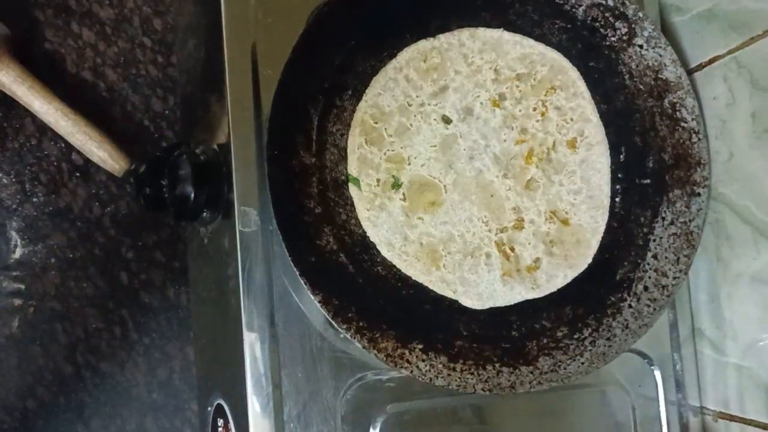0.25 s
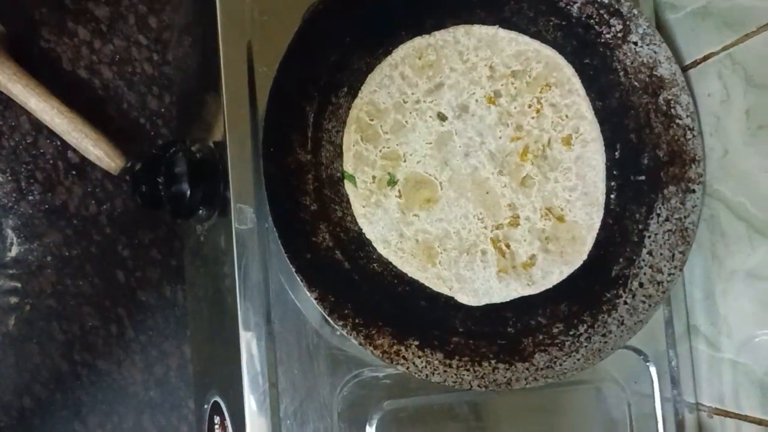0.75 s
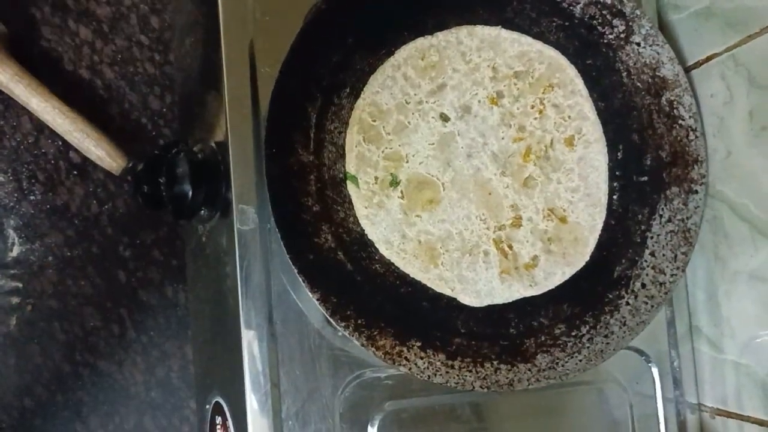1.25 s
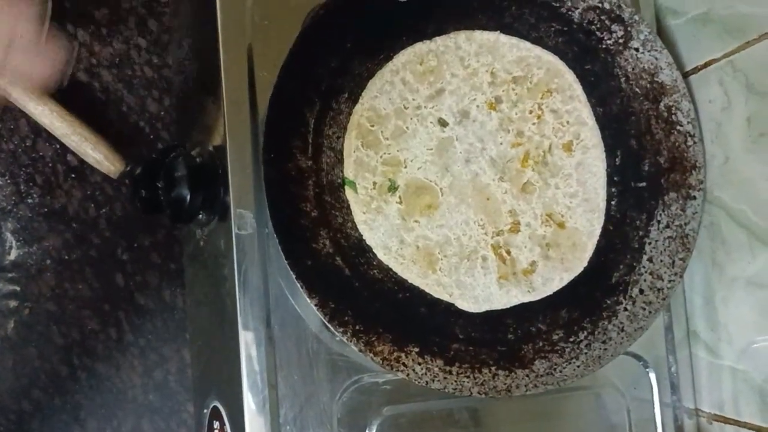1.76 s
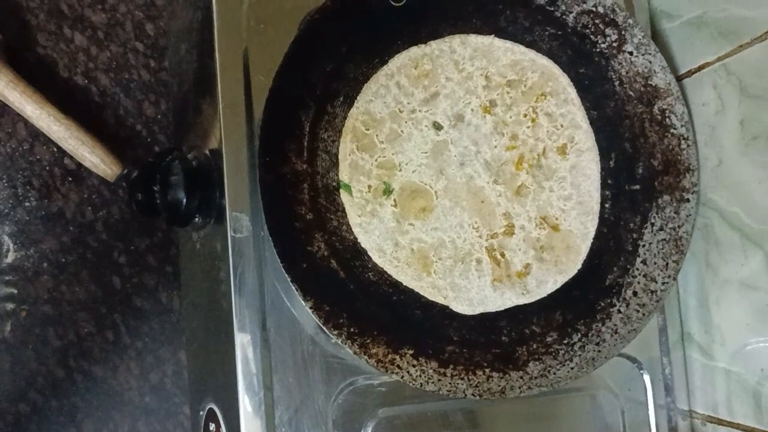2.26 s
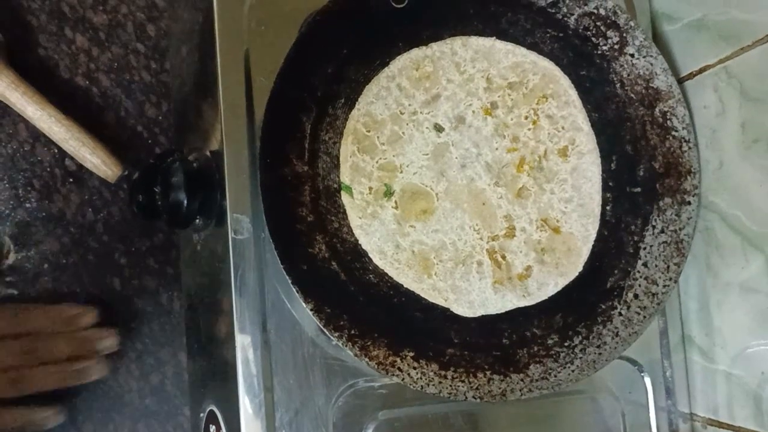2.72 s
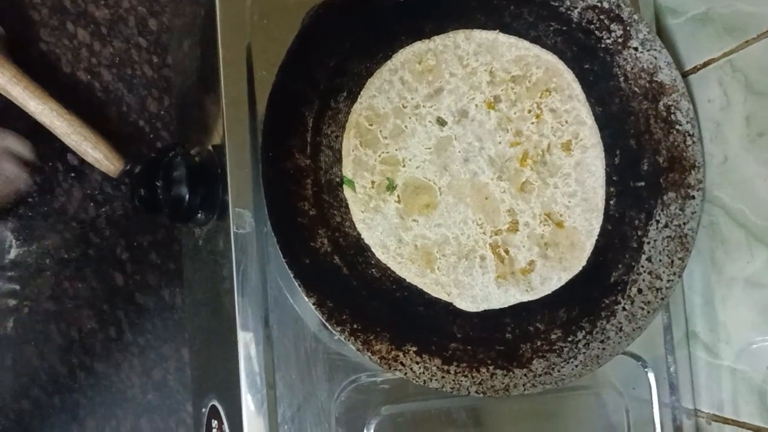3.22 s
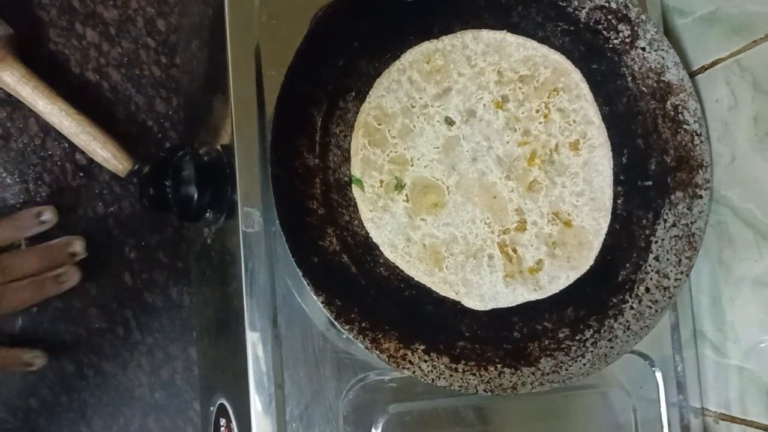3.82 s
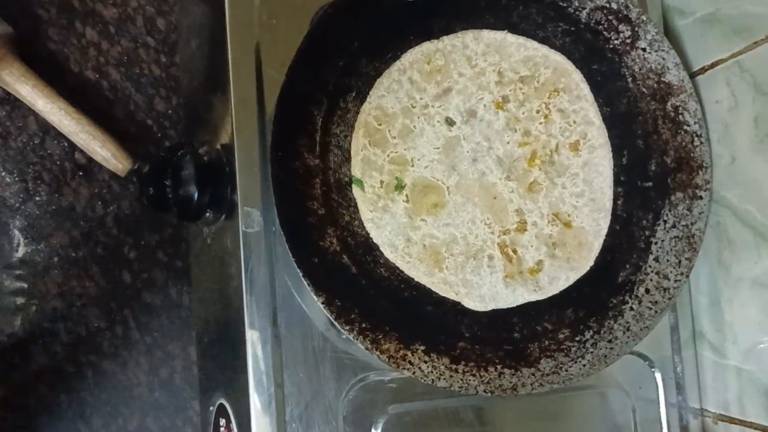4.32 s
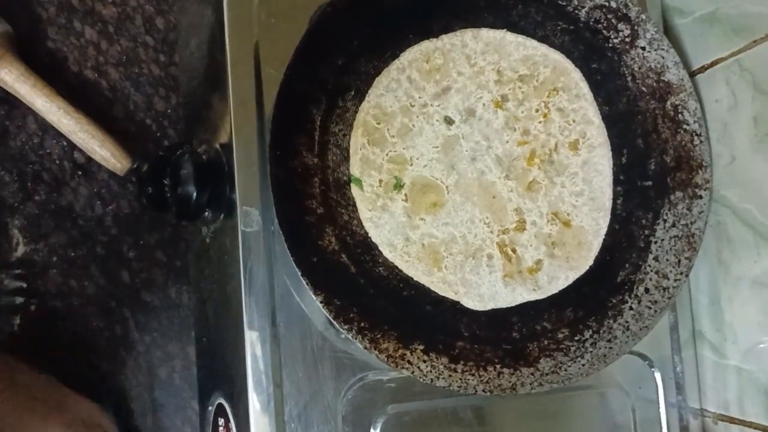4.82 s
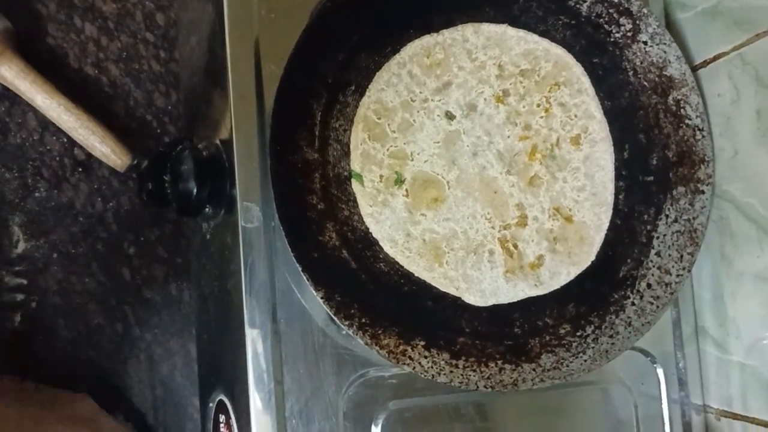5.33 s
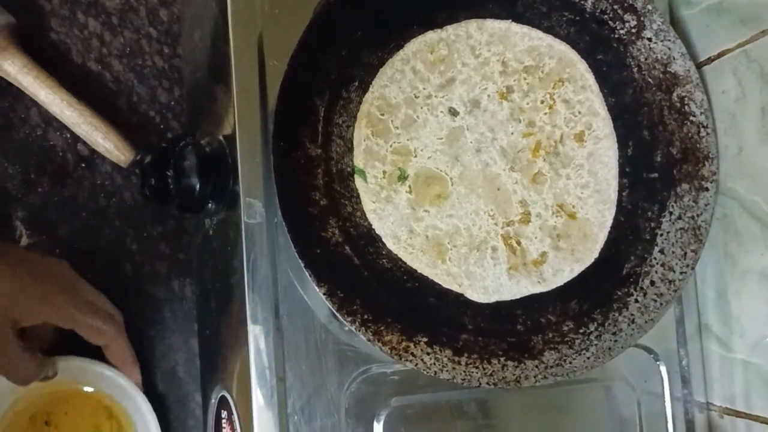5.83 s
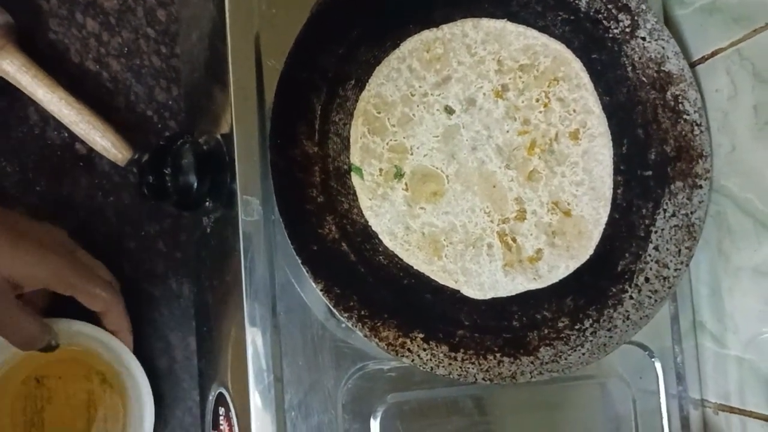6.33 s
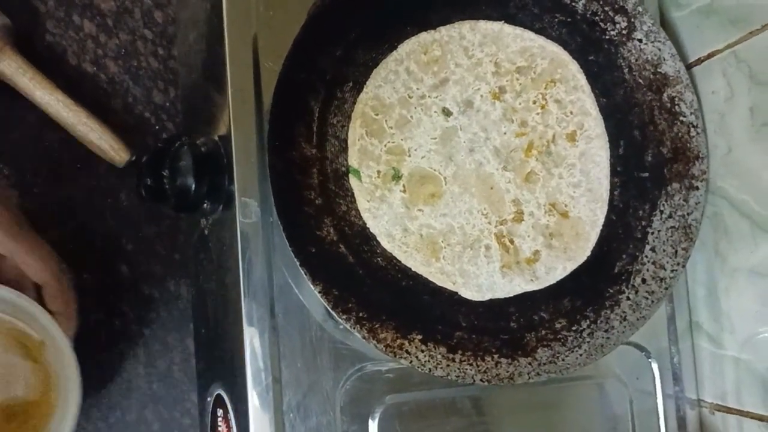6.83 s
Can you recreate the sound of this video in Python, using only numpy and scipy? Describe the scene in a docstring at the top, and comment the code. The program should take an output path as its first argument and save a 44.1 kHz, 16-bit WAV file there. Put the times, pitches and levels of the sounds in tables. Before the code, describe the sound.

Close kitchen sounds with short reflections: quiet steady stove noise and a trace of sizzle under soft handling rustle. Delicate spoon clinks grow louder and quicker, ending in one hard ringing knock on the worktop. After a pause, a bowl's foot judders and squeaks over stone, is shoved again with a rattling metallic clatter, and settles, leaving faint last touches.

```python
"""In a small hard kitchen, a steel spoon and a metal bowl are handled on a stone counter by a lit stove.
Spoon clinks, counter knocks and bowl taps are noisy cracks plus ringing tones that die away.
The bowl is dragged with a juddering groan, then scrapes and clatters to rest: many tiny random slips
drive its resonances. Steady filtered noise makes the burner. Echoes of the kitchen follow the contacts.
"""
import sys
import numpy as np
from scipy import signal
from scipy.io import wavfile
from scipy.ndimage import uniform_filter1d

SR = 44100
rng = np.random.default_rng(int(sys.argv[2]) if len(sys.argv) > 2 else 0)


def log_audio(samples):
    """Write samples as a 16-bit WAV file to the path given in sys.argv[1]."""
    # one column per channel
    frames = np.atleast_2d(samples).T
    # limit to full scale, then quantise
    limited = np.clip(frames, -1, 1)
    pcm = np.round(limited * 32767).astype(np.int16)
    wavfile.write(sys.argv[1], SR, pcm)


N = 311787
TIME = np.arange(N) / SR
HALF_SECOND = np.arange(SR // 2) / SR
SPLIT_HZ = 4200  # the treble of a contact lies above this, its middle below


def amp(db):
    """Turns decibels into a gain."""
    return 10 ** (np.asarray(db) / 20)


def evened(x):
    """Scales a sound to an average (rms) level of 1."""
    return x / np.sqrt(np.mean(x ** 2) + 1e-20)


def peaked(x, size=128):
    """Scales a sound so that its loudest stretch of `size` samples has rms 1."""
    return x / np.sqrt(uniform_filter1d(x ** 2, size).max())


def read(points, hz):
    """Reads a table by frequency, joined by straight lines over log frequency."""
    f, value = np.transpose(points)
    return np.interp(np.log(hz + 1), np.log(f + 1), value)


def level(rows, lag_s=0):
    """Turns a dB curve over time into a gain, silent outside its span."""
    s, db = np.transpose(rows)
    return amp(np.interp(TIME - lag_s, s, db, left=-np.inf, right=-np.inf))


def spells(rows, fade_s, column=2):
    """Gain that fades in, holds one dB column of each row, and fades out."""
    gain = 0
    for row in rows:
        to_nearest_end = np.minimum(TIME - row[0], row[1] - TIME)
        gain = gain + amp(row[column]) * np.clip(to_nearest_end / fade_s + .5, 0, 1)
    return gain


def add(mix, s, sound):
    """Mixes a sound in at time s."""
    part = mix[max(round(s * SR), 0):][:len(sound)]
    part += sound[:len(part)]


def colour(x, points, size=2048):
    """Gives a sound the spectrum in a table, with a filter that never acts ahead of time."""
    log_gain = np.log(amp(read(points, abs(np.fft.fftfreq(size, 1 / SR)))))
    # minimum phase: the filter responds as early as its spectrum allows
    taps = np.fft.ifft(np.exp(np.conj(signal.hilbert(log_gain)))).real
    return signal.oaconvolve(x, taps[:size // 2])[:len(x)]


def band(x, hz, kind, order=4):
    """Keeps the highs, the lows or a band (Butterworth filter)."""
    return signal.sosfilt(signal.butter(order, hz, kind, fs=SR, output="sos"), x)


def resonances(x, peaks):
    """Lets a sound drive resonances side by side, each at its own level; rms 1."""
    out = 0
    for hz, width, db in peaks:
        # two passes make the peak steep; together they narrow it, so each is made wider
        b, a = signal.iirpeak(hz, hz / (1.5 * width), SR)
        once = signal.lfilter(b, a, x)
        out = out + amp(db) * evened(signal.lfilter(b, a, once))
    return evened(out)


def ringing(modes, vary_db=2):
    """Half a second of ringing tones (modes), each woken a little differently; t60 = time to fall 60 dB."""
    hz, db, t60 = np.transpose(modes)
    strength = amp(db + vary_db * rng.uniform(-1.4, 1, len(hz)))
    woken = strength * np.exp(2j * np.pi * rng.random(len(hz)))
    swing_and_decay = 2j * np.pi * hz[:, None] - np.log(1000) / t60[:, None]
    return (woken @ np.exp(swing_and_decay * HALF_SECOND)).real


def after_ring(rows, modes, rise_s):
    """Modes that swell a moment after the contact, then die away."""
    out = np.zeros(N)
    for s, db in rows:
        ring = ringing(modes, vary_db=-0.5) * (1 - np.exp(-HALF_SECOND / rise_s))
        add(out, s, amp(db) * peaked(ring, size=512))
    return out


# a firmer blow rings louder and booms more: dB gained for each dB above a firm blow
FIRM_DB, RING_GROWTH, THUMP_GROWTH = -26, 0.39, 0.54


def strikes(rows, modes, crack_colour, crack_t60, ring_db):
    """Each blow is a short crack plus ringing modes; each row sets how strong it is below the treble."""
    out = np.zeros(N)
    # steel meets a hard surface: most of the push comes in the first millisecond
    snap = 2.5 * np.exp(-HALF_SECOND / .0008)
    force = snap + np.exp(-np.log(1000) * HALF_SECOND / crack_t60)
    onset = 1 - np.exp(-HALF_SECOND / 0.000067)
    for s, treble_db, middle_db in rows:
        noise = rng.standard_normal(len(HALF_SECOND))
        crack = peaked(colour(noise * force, crack_colour))
        ring_gain = amp(ring_db + RING_GROWTH * (treble_db - FIRM_DB))
        blow = crack + ring_gain * ringing(modes) * onset
        treble = peaked(band(blow, SPLIT_HZ, "high"))
        middle = peaked(band(blow, SPLIT_HZ, "low"))
        add(out, s, amp(treble_db) * (treble + amp(middle_db) * middle))
    return out


def thumps(rows, firm_db, rise_s, fall_s, low_hz=65, high_hz=190):
    """The counter takes up each blow as a dull boom that swells and fades."""
    out = np.zeros(N)
    swell = (1 - np.exp(-HALF_SECOND / rise_s)) * np.exp(-HALF_SECOND / fall_s)
    for s, treble_db, _ in rows:
        noise = rng.standard_normal(len(HALF_SECOND))
        boom = band(noise, [low_hz, high_hz], "band", order=2) * swell
        gain = amp(firm_db + THUMP_GROWTH * (treble_db - FIRM_DB))
        add(out, s, gain * peaked(boom, size=1024))
    return out


def friction(per_s, spread_db):
    """Tiny slips of uneven size at random moments."""
    unevenness = np.minimum(rng.exponential(1, N), 4)
    sizes = amp(spread_db * unevenness) * rng.choice([-1., 1.], N)
    return evened(sizes * (rng.random(N) < per_s / SR))


def flutter(rate_hz, depth_db):
    """Uneven contact pressure, as a gain that wanders at random."""
    return amp(depth_db * evened(band(rng.standard_normal(N), rate_hz, "low", order=2)))


def grains(per_s, spread_db, depth_db, count=16):
    """Fine friction grains: each range of pitch flickers on its own."""
    edges_hz = np.linspace(10, 127, count + 1) ** 2
    out = np.zeros(N)
    for pair in zip(edges_hz, edges_hz[1:]):
        out += band(friction(per_s, spread_db), pair, "band", order=2) * flutter(30, depth_db)
    return evened(out)


# how long the kitchen echoes at each pitch: (frequency [Hz], t60 [s])
KITCHEN_T60 = [(80, 0.24), (250, 0.15), (600, 0.55), (2000, 0.28), (5000, 0.3), (9000, 0.21), (15000, 0.2)]


def kitchen(x, wet_db, near_db, build_s=0.0068, size=32768):
    """Direct sound, a few quick reflections from counter and wall, and a tail that dies band by band."""
    taps = rng.choice([-1., 1.], size) * (rng.random(size) < .2)
    hz, t, z = signal.stft(taps, SR, nperseg=256)
    decay = amp(-60 * t / read(KITCHEN_T60, hz)[:, None])
    tail = signal.istft(z * decay, SR, nperseg=256)[1][:size]
    tail *= 1 - np.exp(-np.arange(size) / SR / build_s)
    echo = amp(wet_db) * tail / np.linalg.norm(tail)
    delays = (SR * (.001 + .012 * rng.random(8))).astype(int)
    echo[delays] += amp(near_db) * rng.choice([-1., 1.], len(delays))
    return x + signal.fftconvolve(x, echo)[:N]


# spectrum of burner and kitchen air: (frequency [Hz], level [dB])
AIR_COLOUR = [(15, -65), (25, -28.5), (75, 1), (160, -7), (215, -16.5), (598, -16.5), (722, -20),
              (970, -23.5), (1080, -22.5), (1490, -25), (1660, -27.5), (2560, -28), (5430, -46),
              (15500, -49.5)]
# where the sizzle is strongest: (frequency [Hz], width [Hz], level [dB])
SIZZLE_PEAKS = [(6430, 420, 4), (8840, 1600, 9)]
# spells of a faint far tone: (start [s], end [s], level [dB])
FAR_TONE = [(0, 1.1, -83), (1.03, 1.88, -76)]
# pitches of that tone: (frequency [Hz], width [Hz], level [dB])
FAR_TONE_LINES = [(984, 27, 8.5), (1480, 35, 3)]
BURNER_RUMBLE_DB, BURNER_HISS_DB, SIZZLE_DB = -67, -73.5, -88  # all steady


def stove(split_hz=270):
    """Filtered noise gives burner rumble and hiss and a far tone; tiny random pops give a faint sizzle."""
    air = colour(rng.standard_normal(N), AIR_COLOUR, size=8192)
    rumble = amp(BURNER_RUMBLE_DB) * evened(band(air, split_hz, "low"))
    hiss = amp(BURNER_HISS_DB) * evened(band(air, split_hz, "high"))
    sizzle = amp(SIZZLE_DB) * resonances(friction(per_s=11000, spread_db=3.5), SIZZLE_PEAKS)
    far_tone = resonances(rng.standard_normal(N), FAR_TONE_LINES)
    return rumble + hiss + sizzle + spells(FAR_TONE, fade_s=0.023) * far_tone


# light spoon clinks: (time [s], treble level [dB], middle level above treble [dB])
CLINK_HITS = [(.19, -49, -22), (.4833, -37, -18), (.6201, -51.5, -20), (.7528, -37, -24),
              (.9968, -44.5, -15), (1.0295, -45, -22), (1.181, -54.5, -15), (1.2027, -64, -4),
              (2.259, -57, -15), (2.3195, -36, -24), (2.5266, -27, -17), (2.7227, -27.5, -24.5),
              (2.9339, -22.5, -17.5), (3.0141, -31, -13.5), (3.1272, -40.5, -14.5), (3.2266, -23.5, -22),
              (3.5813, -24, -29.5), (3.5875, -23, -18), (4.2464, -32.5, -18), (5.4709, -49, -14.5),
              (5.7018, -34.5, -11.5), (6.4851, -48, -14), (6.7471, -57.5, -8.5), (6.821, -43.5, -16)]
# ringing modes of the spoon: (frequency [Hz], level [dB], t60 [s])
SPOON_MODES = [(1945, -6, .24), (2160, -12, .14), (2600, -7, .07), (5500, -26, .3), (5540, -22, .12),
               (6075, -27, .3), (8150, -16, .06), (10430, -9, .08), (10500, 1, .07), (10508, -15, .3),
               (11570, -25, .3), (12100, -18, .07), (15150, -20, .09)]
# colour of the spoon's first crack: (frequency [Hz], level [dB])
SPOON_CRACK_COLOUR = [(150, 4.5), (800, 3.5), (2700, 2), (4200, -14.5), (5200, -9.5), (5850, -8),
                      (6500, -5.5), (7200, -6.5), (8200, 1.5), (9800, -2), (10500, 1), (11200, -8),
                      (12100, 0.5), (13800, -19), (15300, 0.5)]


def spoon_clinks():
    """Light touches of the spoon: a tiny crack, then the spoon's own ringing modes."""
    return strikes(CLINK_HITS, SPOON_MODES, SPOON_CRACK_COLOUR, crack_t60=.018, ring_db=-9)


def counter_thumps():
    """The counter booms dully under every clink, knock and tap."""
    light = thumps(CLINK_HITS, firm_db=-59.5, rise_s=0.04, fall_s=0.065)
    return light + thumps(KNOCK_HITS + TAP_HITS, firm_db=-54.5, rise_s=0.029, fall_s=0.06)


# spells in which hands move things about on the counter:
# (start [s], end [s], rustle and rumble level [dB], low hum level [dB])
HANDLING_SPELLS = [(.42, .7, -71, -76), (.76, .87, -61, -55), (1.64, 1.9, -68.5, -60),
                   (2.25, 3.36, -68, -58), (3.6, 4.33, -67, -63.5), (4.8, 5.8, -65, -66.5),
                   (5.85, 6.28, -53.5, -58.5), (6.28, 6.7, -68, -81)]
# the low hum: (frequency [Hz], width [Hz], level [dB])
LOW_HUM = [(88.5, 4.6, 0)]


def handling(rumble_db=3, rustle_db=-1, split_hz=270, fade_s=0.12):
    """Moving hands bring a soft rumble and rustle, and a low hum swells with them."""
    noise = colour(rng.standard_normal(N), AIR_COLOUR, size=8192)
    rumble = amp(rumble_db) * evened(band(noise, split_hz, "low"))
    rustle = amp(rustle_db) * evened(band(noise, split_hz, "high"))
    hum = resonances(rng.standard_normal(N), LOW_HUM)
    rub = spells(HANDLING_SPELLS, fade_s, column=2) * (rumble + rustle)
    return rub + spells(HANDLING_SPELLS, fade_s, column=3) * hum


# steel brushing over the counter: (start [s], length [s], level [dB])
SCUFF_STROKES = [(1.45, 0.069, -65), (0.765, 0.14, -73), (1.662, 0.064, -63), (1.711, 0.076, -60),
                 (3.224, 0.094, -48), (3.596, 0.1, -60), (4.136, 0.15, -48), (5.707, 0.066, -51.5),
                 (6.411, 0.053, -65)]
# colour of the strokes: (frequency [Hz], level [dB])
STROKE_COLOUR = [(200, 2.5), (1800, 5.5), (3000, 4.5), (4200, -9), (6500, -3), (9200, 2), (12500, -9.5),
                 (15300, -5)]


def scuffs():
    """Short crunchy strokes of steel over stone, made of tiny slips."""
    out = np.zeros(N)
    grit = evened(colour(friction(per_s=2200, spread_db=0.0), STROKE_COLOUR))
    for s, length, db in SCUFF_STROKES:
        stroke = grit[int(s * SR):][:int(length * SR)]
        add(out, s, amp(db) * stroke * signal.windows.tukey(len(stroke), .5))
    return out


# harder knocks of steel on the counter: (time [s], treble level [dB], middle level above treble [dB])
KNOCK_HITS = [(1.670, -45.5, -6.5), (1.745, -64, 9.5), (1.9047, -47.5, -13.5), (3.684, -34, -2.5),
              (3.800, -40, -9.5), (3.812, -35, -5), (3.938, -43.5, -9), (4.1048, -19.5, -12),
              (4.1158, -27, 4), (4.1203, -21, -20.5)]
# ringing modes of the knocked steel: (frequency [Hz], level [dB], t60 [s])
STEEL_MODES = [(1170, -10, 0.184), (1402, -4, 0.22), (1945, -3.5, 0.13), (2080, -26, .15),
               (3050, -9.5, 0.071), (5400, -22, 0.2), (6130, -12.5, 0.16), (8670, -3.5, 0.024),
               (9600, -10, 0.2), (9040, -8, 0.183), (8960, 24, 0.0085), (9200, -1.5, 0.26),
               (10580, -19.5, .3), (11910, -16, 0.22)]
# colour of each knock's first crack: (frequency [Hz], level [dB])
STEEL_CRACK_COLOUR = [(100, -5.5), (450, 2.5), (950, -1.5), (1550, 5.5), (2800, 1), (4500, -17.5),
                      (5300, -4), (6200, -12.5), (8200, -7.5), (9000, 8), (10000, -5.5), (12400, 3),
                      (13600, -16), (15300, -2.5)]


def counter_knocks():
    """The steel knocks down on the counter: a crack, then the steel's ringing modes."""
    return strikes(KNOCK_HITS, STEEL_MODES, STEEL_CRACK_COLOUR, crack_t60=0.017, ring_db=-14.5)


# clinks near the middle of the spoon make its handle sing: (time [s], level [dB])
HANDLE_PINGS = [(2.527, -59), (2.934, -48), (3.014, -55), (3.227, -49), (3.275, -54), (6.822, -68)]
# bending modes of the handle: (frequency [Hz], level [dB], t60 [s])
HANDLE_MODES = [(1945, 0, .24), (2590, -2, .07), (5500, -18, .24)]


def handle_pings():
    """The spoon's handle bends to and fro and sings after some clinks."""
    return after_ring(HANDLE_PINGS, HANDLE_MODES, rise_s=0.0012)


# thin squeaks of sliding metal: (middle [s], length [s], level [dB], slip rate [per s])
THIN_SQUEAKS = [(2.791, 0.18, -66, 1170), (4.898, .006, -26.5, 1400), (5.059, 0.0081, -34, 1240),
                (5.269, 0.055, -53, 2310), (5.38, 0.095, -58, 2050)]
# the bowl's foot catches on the stone: (time [s], level [dB])
FOOT_CATCHES = [(4.861, -11.5), (4.931, -1), (4.972, -11), (5.006, -25), (5.113, -4), (5.214, -23),
                (5.284, -28)]
# each catch squeaks, hoots, then drones:
# (delay to the middle [s], length [s], level [dB], slip rate [per s], growth [dB per dB of the catch])
STAGES = [(-.024, .022, -31.5, 1165, 1), (0, .054, -20, 402, 1), (0.013, .095, -24.5, 304, 4.4)]
# overtones of the slips: (multiple of the slip rate [-], level [dB])
SLIP_PARTIALS = [(1, 7.5), (2, -14.5), (3, -13.5), (4, -35)]


def judders(jitter=0.023):
    """For moments the slips lock to a resonance and the sliding metal hoots or squeaks."""
    out = np.zeros(N)
    wander = evened(uniform_filter1d(rng.standard_normal(N), 150))
    bursts = []
    for s, catch_db in FOOT_CATCHES:
        for delay, length, db, hz, growth in STAGES:
            bursts.append((s + delay, length, db + growth * catch_db, hz))
    for s, length, db, hz in bursts + THIN_SQUEAKS:
        count = int(length * SR)
        # the pitch wavers slightly; turns counts the slips so far
        turns = np.cumsum(hz * (1 + jitter * wander[int(s * SR):][:count])) / SR
        tone = sum(amp(part_db) * np.sin(2 * np.pi * round(k) * turns) for k, part_db in SLIP_PARTIALS)
        add(out, s - length / 2, amp(db) * evened(tone) * np.hanning(count))
    return out


# heavy knocks leave a longer ring in the worktop and the steel: (time [s], level [dB])
HEAVY_KNOCKS = [(3.685, -56), (3.813, -57), (4.106, -43), (4.123, -31)]
# modes of that ring: (frequency [Hz], level [dB], t60 [s])
WORKTOP_MODES = [(290, -10, .15), (396, -1, .27), (581, 0, .24), (700, -14, .25), (904, -12, .25),
                 (5495, -16, .26), (6067, -5, .26), (11540, -11, .26)]


def worktop_ring():
    """Worktop and steel ring on together after the heavy knocks."""
    return after_ring(HEAVY_KNOCKS, WORKTOP_MODES, rise_s=0.0061)


# speed of the dragged bowl, as the level of its grit: (time [s], level [dB])
DRAG_SPEED = [(4.7, -83), (4.8, -65), (4.838, -52), (4.918, -47), (4.968, -52), (5.094, -44.5),
              (5.19, -53.5), (5.538, -70.5), (5.58, -81.5)]
# low resonances of the bowl pressed to the counter: (frequency [Hz], width [Hz], level [dB])
GROAN_PEAKS = [(129, 22.5, -5.5), (160.4, 14, -10), (262, 23, -7.5), (310.2, 2.5, -8.5), (418, 7.3, -3),
               (470.4, 24, -5.5), (570, 86, -10), (781, 66, -15.5), (908, 60, -12.5)]
# its higher, rasping resonances: (frequency [Hz], width [Hz], level [dB])
RASP_PEAKS = [(1155, 35, 0), (1260, 35, -6), (1440, 220, -10)]
# colour of the grit under the foot: (frequency [Hz], level [dB])
GRIT_COLOUR = [(1060, -9), (1800, -3), (2140, -13), (2750, -1.5), (3260, -4), (4090, -10.5), (4430, -7.5),
               (4940, -11), (6130, -7.5), (7820, -13), (8550, -5), (9530, -10.5), (10300, -17),
               (14600, -21.5), (15500, -26.5)]
FULL_SPEED_DB = -45.5
# the hand bears down at the start of the drag, then eases off, so groan and rasp fade before the grit
PRESS_S, EASE_DB_PER_S = 4.93, 41
GROAN_GROWTH, RASP_GROWTH, GROAN_LAG_S = 1.12, 0.94, 0.016  # dB per dB of speed; the groan builds up late


def drag(groan_db=-32, rasp_db=-38, grit_db=-1):
    """The bowl's foot slips over the stone in tiny steps, which drive the damped bowl."""
    slips = friction(per_s=4000, spread_db=3)
    pressure = amp(-EASE_DB_PER_S * np.maximum(TIME - PRESS_S, 0))
    speed = level(DRAG_SPEED) / amp(FULL_SPEED_DB)
    late_speed = level(DRAG_SPEED, GROAN_LAG_S) / amp(FULL_SPEED_DB)
    groan = amp(groan_db) * pressure * late_speed ** GROAN_GROWTH * resonances(slips, GROAN_PEAKS)
    rasp = amp(rasp_db) * pressure * speed ** RASP_GROWTH * resonances(slips, RASP_PEAKS)
    grit = evened(colour(grains(per_s=2500, spread_db=3, depth_db=2.5), GRIT_COLOUR))
    return groan + rasp + amp(grit_db) * level(DRAG_SPEED) * grit


# where the rim is touched, one mode sings out: (time [s], level [dB], frequency [Hz], t60 [s])
RIM_NOTES = [(5.702, -55, 11600, .25), (5.912, -54, 3940, .2), (5.945, -49, 8420, .16),
             (6.02, -37, 9950, .24), (6.173, -45, 8060, .25), (6.174, -50, 6540, .3),
             (6.486, -66, 2330, .15)]


def rim():
    """Single clear notes of the bowl's rim, each one dying mode."""
    return sum(after_ring([(s, db)], [(hz, 0, t60)], rise_s=.002) for s, db, hz, t60 in RIM_NOTES)


# the bowl pushed the last stretch, in two shoves: (time [s], rattle level [dB])
SHOVES = [(5.77, -58.5), (5.954, -42), (6.008, -30), (6.142, -45.5), (6.178, -34), (6.194, -38),
          (6.218, -35.5), (6.23, -42), (6.34, -80)]
# ringing modes of the bowl, also used by its taps: (frequency [Hz], level [dB], t60 [s])
BOWL_MODES = [(403.5, -2, 0.19), (792, -5, 0.19), (834, -6, 0.28), (1328, -1.5, 0.087), (1488, -10.5, .15),
              (1410, -24, 0.157), (1525, 1.5, 0.1), (1907, 9, 0.051), (2024, -4, 0.06), (2125, 3, 0.073),
              (2730, -21, 0.13), (2690, -13.5, 0.18), (2806, 2, 0.16), (4000, -14, .18), (4644, -12, .18),
              (5200, -12.5, 0.13), (6540, -18, 0.16), (7000, -33, 0.177), (8030, -5.5, 0.25),
              (8080, -17, 0.12), (9250, -12, .12), (9250, 1.5, 0.1), (9944, -8, 0.14), (9950, 3.5, .14),
              (11800, -12.5, .1), (11650, -6, 0.155), (13300, -12.5, .16), (14300, -22.5, .1),
              (15350, -15, .12)]
# colour of the bowl's contacts, also used by its taps: (frequency [Hz], level [dB])
BOWL_CRACK_COLOUR = [(150, -13.5), (400, -8), (1000, -8), (1400, 6), (1700, 0.5), (2000, 9.5), (2500, -2.5),
                     (2850, -0.5), (3700, -9.5), (5700, -11), (8300, -1), (10800, -17.5), (12000, -7.5),
                     (15300, -27.5)]


def scrape(rattle_db=-1, ring_db=-2, treble_db=-11.5, treble_lag_s=0.005, width_hz=25):
    """Held lightly, the sliding bowl chatters; as the contact wanders, different modes take the lead."""
    contacts = grains(per_s=900, spread_db=3, depth_db=4.5)
    ring = np.zeros(N)
    for hz, db, _ in BOWL_MODES:
        ring += amp(db) * resonances(contacts, [(hz, width_hz, 0)]) * flutter(9, 5)
    sound = amp(ring_db) * evened(ring) + evened(colour(contacts, BOWL_CRACK_COLOUR))
    rattle = amp(rattle_db) * level(SHOVES) * evened(band(sound, SPLIT_HZ, "low"))
    # the treble follows the rattle
    treble = amp(treble_db) * level(SHOVES, treble_lag_s) * evened(band(sound, SPLIT_HZ, "high"))
    return rattle + treble


# the bowl's foot tapping the counter: (time [s], treble level [dB], middle level above treble [dB])
TAP_HITS = [(5.825, -56.5, 14.5), (5.875, -55, 8.5), (5.911, -49, 16), (5.953, -56, 8.5),
            (5.973, -44, 16.5), (5.995, -36.5, 8), (6.008, -37.5, 13), (6.019, -22.5, -5), (6.172, -43, 16),
            (6.215, -46, 22)]


def bowl_taps():
    """The bowl's foot clatters on the counter: a longer crack, then the bowl's ringing modes."""
    return strikes(TAP_HITS, BOWL_MODES, BOWL_CRACK_COLOUR, crack_t60=0.12, ring_db=-5)


def scene():
    """Spoon, bowl and stove in the kitchen."""
    mix = stove() + handling()
    mix += amp(-4) * kitchen(spoon_clinks(), wet_db=-1.5, near_db=-10.5)
    mix += kitchen(counter_knocks(), wet_db=-3, near_db=-11)
    mix += amp(-3.5) * kitchen(bowl_taps() + scrape() + scuffs(), wet_db=-12.5, near_db=-19)
    mix += kitchen(drag(), wet_db=-9.5, near_db=-13)
    mix += kitchen(judders(), wet_db=-10.5, near_db=-21.0)
    # these slow rings and booms go in without echoes
    mix += counter_thumps() + handle_pings() + worktop_ring() + rim()
    return mix[None]


def record(dry, edge_hz=15550):
    """The microphone drops the deepest bass; then everything above the upper edge is cut."""
    thin = band(dry, 32, "high", order=2)
    low_pass = signal.firwin(255, edge_hz, window=("kaiser", 8), fs=SR)
    return signal.oaconvolve(thin, low_pass[None], "same")


dry = scene()
out = record(dry)
log_audio(out)
```